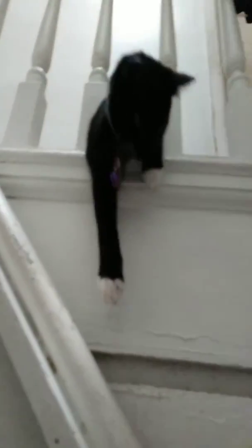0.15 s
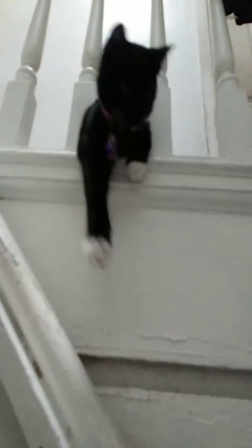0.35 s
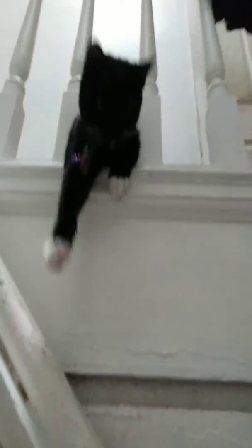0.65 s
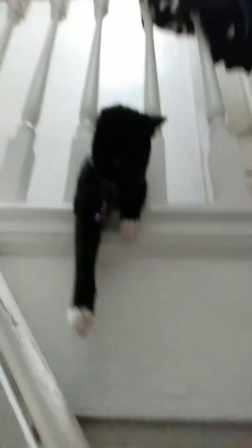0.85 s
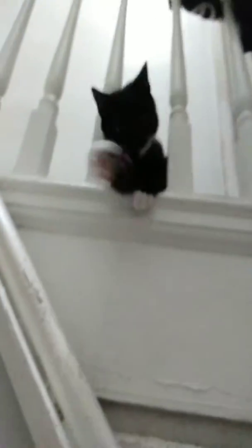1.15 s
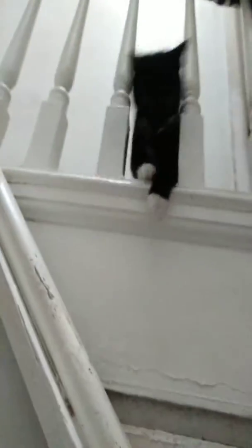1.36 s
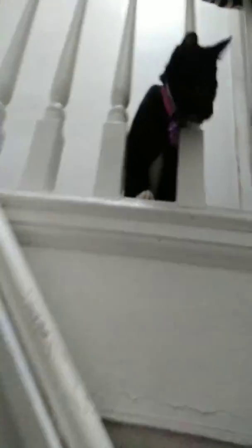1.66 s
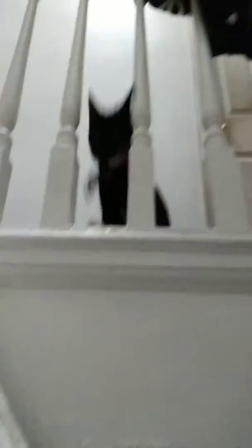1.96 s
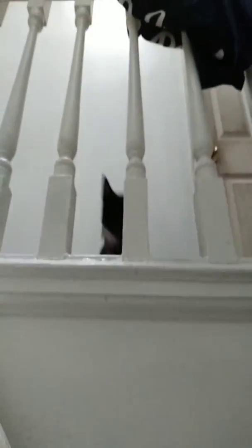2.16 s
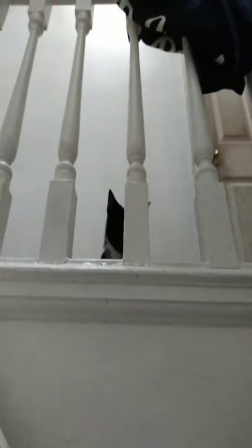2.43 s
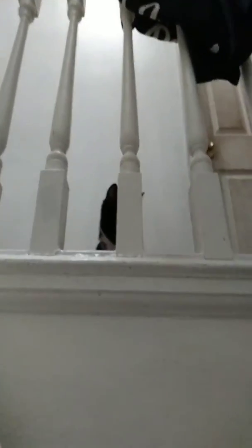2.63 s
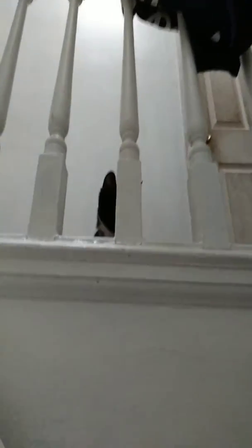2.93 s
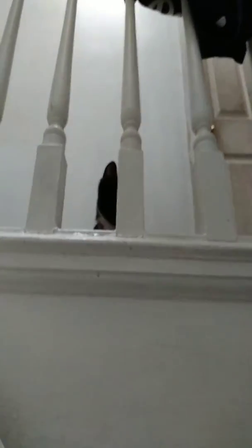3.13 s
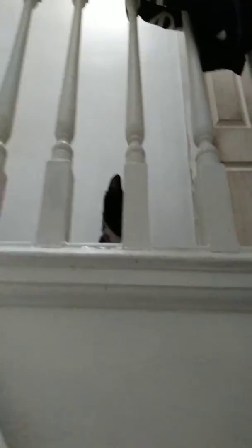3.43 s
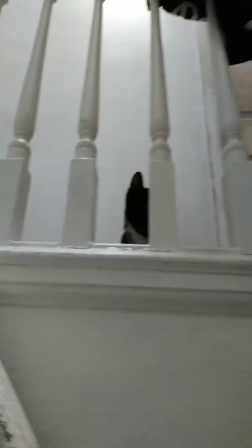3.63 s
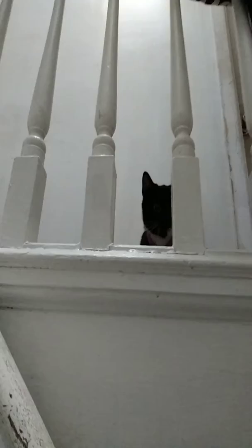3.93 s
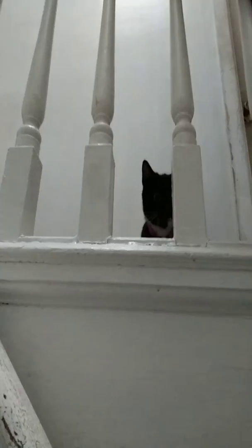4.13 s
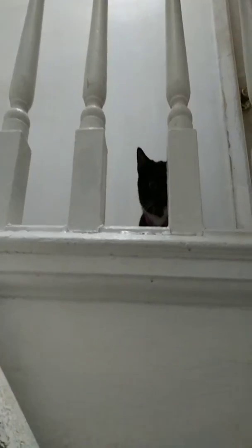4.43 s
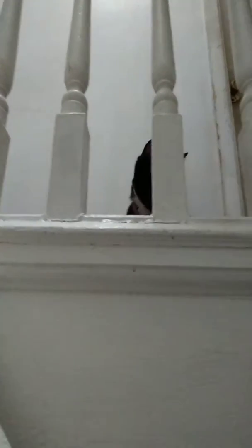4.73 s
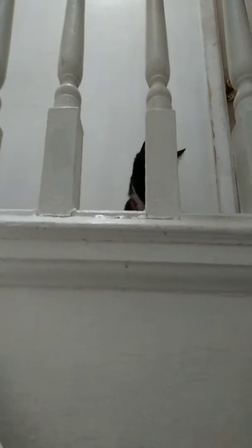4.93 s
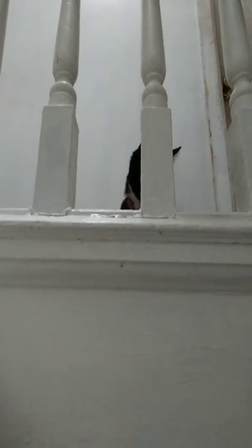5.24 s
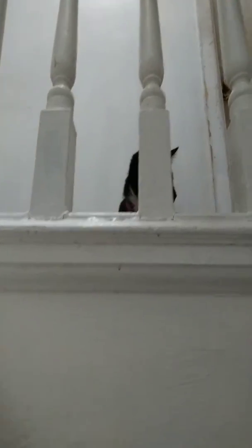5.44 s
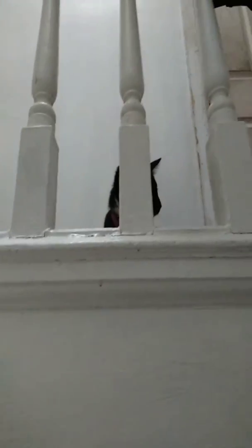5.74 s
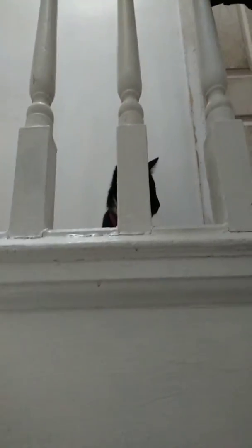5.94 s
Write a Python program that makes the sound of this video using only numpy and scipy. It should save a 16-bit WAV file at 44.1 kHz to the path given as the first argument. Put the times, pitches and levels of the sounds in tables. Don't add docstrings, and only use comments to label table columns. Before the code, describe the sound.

Low, steady room hiss with a very faint hum runs throughout, close to silence at first. Around 0.8 s come a couple of tiny ticks, then at 1.1 s a thin, high bell clink with light rustling, and fainter tinkles with soft paw thumps at 1.3-1.4 s. At about 1.87 s the collar bell is shaken hard: a very loud, piercing metallic chatter lasting under a tenth of a second, the tag knocking lower beneath it, overloading the microphone. A clear ting at 2.03 s and weak tinkles to 2.35 s die in a short, bare stairwell echo. Rustling, a soft thump and dry ticks come at 3.0-3.2 s, small ticks and a wooden knock at 3.7-4.1 s. After a lull, a sharp tick at 4.88 s starts scattered claw ticks, wooden taps, muffled thumps and rustles until about 5.8 s, leaving hiss.

```python
import sys
import numpy as np
from scipy import signal
from scipy.fft import next_fast_len
from scipy.io import wavfile
from scipy.ndimage import uniform_filter1d

SR = 44100
rng = np.random.default_rng(int(sys.argv[2]) if len(sys.argv) > 2 else 0)


def store_wav(level_fs):
    pcm = np.round(np.clip(np.atleast_2d(level_fs), -1, 1) * 32767)
    wavfile.write(sys.argv[1], SR, pcm.T.astype(np.int16))


def voltage_ratio(decibels):
    exponent = np.asarray(decibels, float) / 20
    return 10 ** exponent


N = 268128


def evened(x):
    return x / np.sqrt(np.mean(x ** 2) + 1e-30)


def read(points, hz):
    f, value = np.transpose(points)
    return np.interp(np.log(hz + 1), np.log(f + 1), value)


def add(mix, s, sound):
    part = mix[round(s * SR):][:len(sound)]
    part += sound[:len(part)]


def band(x, lo_hz, hi_hz):
    return signal.sosfilt(signal.butter(4, [lo_hz, hi_hz], "bandpass", fs=SR, output="sos"), x)


def coloured(x, points):
    gain_db = np.maximum(read(points, abs(np.fft.fftfreq(2048, 1 / SR))), -80)
    log_gain = np.log(voltage_ratio(gain_db))
    taps = np.fft.ifft(np.exp(np.conj(signal.hilbert(log_gain)))).real[:1024]
    return signal.oaconvolve(x, taps)[:len(x)]


def ring(hz, t60, rise=0.0015):
    t = np.arange(round(1.3 * t60 * SR)) / SR
    onset = np.sin(np.pi / 2 * np.minimum(t / rise, 1)) ** 2
    return onset * voltage_ratio(-60 * t / t60) * np.sin(2 * np.pi * hz * t)


def room_tone(patchy_db=1.26):
    # frequency in Hz, density in dB per Hz.
    hiss_colour = [(26, -41), (45, -8.5), (226, -1.5), (275, -1.5), (417, -3.5), (533, -7), (681, -7),
                   (891, -10.5), (1720, -11.5), (2680, -20.5), (4820, -20.5), (6160, -29), (8670, -13),
                   (10500, -23.5), (15600, -25)]
    # frequency in Hz, level in dB.
    hum_tones = [(59, -80), (118.4, -81), (236.9, -77.5), (419.9, -74.5), (457.6, -85), (683.7, -85)]
    frames, hz = N // 512 + 5, np.fft.rfftfreq(2048, 1 / SR)
    real, imag, patches = rng.standard_normal((frames, 1025, 3)).T
    patches = uniform_filter1d(patches, 20, 0)
    patches = evened(uniform_filter1d(patches, 12, 1))
    z = (real + 1j * imag) * voltage_ratio(read(hiss_colour, hz)[:, None] + patchy_db * patches)
    hiss = signal.istft(z, nperseg=2048, noverlap=1536)[1][:N]
    out = voltage_ratio(-62) * evened(hiss)
    t = np.arange(N) / SR
    for f_hz, db in hum_tones:
        waver_db = 3 * evened(uniform_filter1d(rng.standard_normal(N), 5000))
        drift_rad = 0.928 * evened(uniform_filter1d(rng.standard_normal(N), 5000))
        out += np.sqrt(2) * voltage_ratio(db + waver_db) * np.sin(2 * np.pi * f_hz * t + drift_rad)
    return out


def movements():
    # start in seconds, hold in seconds, release in seconds per 20 dB, level in dB, weight
    # behind it in dB.
    jerks = [(0.838, 0.0098, 0.05, -82.5, 12), (1.139, 0.019, 0.07, -71.5, 7), (1.293, .006, 0.07, -72, 7),
             (1.339, 0.082, 0.14, -73.5, -2.5), (1.422, 0.0124, 0.11, -80, 17),
             (1.863, 0.0064, 0.0357, -43, -6), (1.877, 0.0412, .11, -53, 0),
             (2.103, 0.0665, 0.0373, -69, 10.5), (3.003, 0.1227, 0.1072, -64.5, -1),
             (3.157, .022, .16, -64.5, 5), (3.659, .006, .015, -84, 24.5),
             (4.874, 0.0163, 0.113, -61, -0.5), (5.073, 0.0064, 0.0479, -64, 10.5),
             (5.095, .016, 0.06, -69, 9), (5.375, 0.0146, 0.0342, -60, 3), (5.399, .085, 0.08, -64, 3),
             (5.648, .01, 0.14, -76.5, 11.5)]
    # start in seconds, hold in seconds, swell in seconds per 20 dB,
    # level in dB, weight behind it in dB.
    shifts = [(0.773, 0.0103, 0.01, -86.5, 13.5), (1.548, 0.155, 0.32, -75, -1.5),
              (1.992, 0.098, 0.19, -71, 7), (2.97, 0.031, 0.03, -73.5, -13.5), (3.04, 0.029, 0.07, -66, -2),
              (3.081, 0.0385, 0.0561, -72, 14), (3.5, .25, 0.16, -78, -2), (3.76, 0.0192, 0.02, -76, -5.5),
              (3.83, 0.021, 0.06, -70, 0), (3.988, .03, 0.07, -74.5, 0),
              (4.065, 0.0195, 0.0731, -66.5, -1.5), (4.23, 0.0203, 0.19, -75, 3),
              (4.84, 0.0193, 0.32, -78.5, 5), (5.02, .03, 0.07, -74.5, 5.5), (5.2, .12, 0.2, -79, 12),
              (5.349, .01, 0.1, -70, 3.5)]
    jerk_rise_s = 0.003
    strokes = [(*row, jerk_rise_s) for row in jerks]
    strokes += [(*row, row[2]) for row in shifts]
    t, light, heavy = np.arange(N) / SR, np.zeros(N), np.zeros(N)
    for s, hold, release, db, weight_db, rise in strokes:
        away = np.maximum((s - t) / rise, (t - s - hold) / release)
        power = voltage_ratio(db - 20 * np.maximum(away, 0)) ** 2
        light += power
        heavy += power * voltage_ratio(weight_db) ** 2
    return np.sqrt(light), np.sqrt(heavy)


def rubbing(grains_per_s=6000, spread_db=2.6):
    # frequency in Hz, density in dB per Hz.
    treble_colour = [(1760, -29.5), (3000, -14), (4890, -12), (6260, -16.5), (7080, -15.5), (8120, -1),
                     (8640, 2.5), (9190, -1.5), (11300, -13), (15500, -19.5)]
    # frequency in Hz, density in dB per Hz.
    body_colour = [(71, -37.5), (120, -11), (317, -2.5), (539, -10.5), (666, -11), (1220, -7), (3030, -19),
                   (4500, -20.5), (5850, -44.5), (9900, -120)]
    clumps = voltage_ratio(1.303 * evened(uniform_filter1d(rng.standard_normal(N), 400)))
    slips = rng.standard_normal(N) * voltage_ratio(spread_db * np.minimum(rng.exponential(1, N), 4))
    slips = slips * (rng.random(N) < grains_per_s / SR)
    slips = clumps * (slips + 0.5 * rng.standard_normal(N))
    treble, body = coloured(slips, treble_colour), coloured(slips, body_colour)
    treble = treble / band(treble, 10300, 15000).std()
    body = body / band(body, 500, 3500).std()
    light, heavy = movements()
    return treble * light + body * heavy


def thumps():
    # start in seconds, peak in dB, frequency in Hz.
    paw_falls = [(1.255, -55, 285), (1.293, -52.5, 341), (1.786, -49, 311), (1.862, -45.5, 252),
                 (1.866, -57, 70), (5.39, -57.5, 95), (2.08, -47.5, 300.2), (2.237, -54.5, 108.2),
                 (3.089, -45, 258), (4.927, -46.5, 274), (5.08, -48.5, 450), (5.379, -61.5, 425.5),
                 (5.656, -46.5, 295)]
    out = np.zeros(N)
    for s, db, hz in paw_falls:
        t = np.arange(round(6 / hz * SR)) / SR
        swell = 1.1 * hz * t * np.exp(1 - 1.1865 * hz * t)
        add(out, s, voltage_ratio(db) * swell * np.sin(2 * np.pi * hz * t))
    return out


def ticks():
    # start in seconds, peak in dB, body in Hz, body level in dB.
    taps = [(0.7572, -53, 703, -50), (0.8525, -48.5, 720, -54), (1.4244, -58.5, 1420, -55),
            (1.696, -54, 1200, -67), (1.729, -49, 1200, -66.5), (2.032, -35, 1200, -60.5),
            (3.116, -40, 1200, -53.5), (3.1644, -42.5, 767, -42), (3.6633, -64.5, 1900, -37),
            (3.8228, -49, 1720, -50.5), (4.0365, -44, 966, -59.5), (4.0635, -38, 3910, -43),
            (4.0785, -41, 935, -60.5), (4.8781, -26.5, 1014, -45.5), (4.9714, -53, 1370, -64),
            (5.0322, -47.5, 4600, -46), (5.0753, -37.5, 3985, -27), (5.1012, -49, 1460, -40.5),
            (5.1576, -51, 1220, -62.5), (5.2446, -43.5, 1230, -50), (5.285, -60, 3600, -56.5),
            (5.351, -40, 1106, -56.5), (5.3745, -33, 1150, -47), (5.3837, -38.5, 1463, -35.5),
            (5.468, -39, 1040, -46.5), (5.648, -58, 1000, -47), (5.6842, -50, 954, -58),
            (5.7633, -47, 4500, -55)]
    # start in seconds, body in Hz, body level in dB.
    knocks = [
        (1.4259, 3000, -43),
        (2.083, 4000, -45.5),
        (1.1381, 4500, -46.5),
        (5.0755, 6100, -42),
        (5.0761, 615, -39.5),
        (5.3856, 2480, -38),
        (5.3873, 4500, -36),
        (3.6645, 900, -46),
        (1.864, 3300, -36),
    ]
    # frequency in Hz, density in dB per Hz.
    click_colour = [(880, -46), (1500, -8), (2170, -5), (2890, -32), (4750, -2.5), (5140, -12), (8880, 12),
                    (14800, -16), (15500, -36)]
    bright, body, t = np.zeros(N), np.zeros(N), np.arange(4000) / SR
    rattle_s = 0.0273
    snap = 0.2 * np.exp(-t / 0.00016) + 0.11 * np.exp(-t / rattle_s * 3.02)
    for (s, db, *_), grit in zip(taps, rng.standard_normal((len(taps), len(t)))):
        add(bright, s, voltage_ratio(db) * (0.75 * (t == 0) + snap * grit))
    for s, *_, hz, body_db in taps + knocks:
        add(body, s, voltage_ratio(body_db) * ring(hz, 14 / hz, rise=1.03 / hz))
    click_peak = abs(coloured(np.arange(2048) == 0, click_colour)).max()
    return coloured(bright, click_colour) / click_peak + body


def tag():
    # start in seconds, level in dB.
    tag_knocks = [
        (1.8629, -39.5),
        (1.889, -42),
        (1.895, -40),
        (1.912, -42),
    ]
    # frequency in Hz, level in dB, t60 in seconds.
    tag_modes = [(2020.8, -6, .05), (2992, -5.5, .05), (3343, -7.5, .03), (3968, -5.5, .06),
                 (4050, -8.5, 0.054), (4285, -2, 0.049)]
    detune = 0.012
    out = np.zeros(N)
    for (s, knock_db), shift in zip(tag_knocks, rng.standard_normal((len(tag_knocks), len(tag_modes)))):
        for (hz, db, t60), z in zip(tag_modes, shift):
            add(out, s, voltage_ratio(knock_db + db) * ring(hz * (1 + detune * z), t60))
    return out


def stairwell(x):
    # frequency in Hz, t60 in seconds.
    decay = [(300, 0.3995), (2000, 0.45), (6000, 0.1), (8000, 0.3104), (10000, 0.24024), (15000, .15)]
    echoes = np.zeros(SR // 2)
    at = np.arange(130, len(echoes) - 12, 12)
    echoes[at + rng.integers(0, 12, len(at))] = rng.choice([-1., 1.], len(at))
    hz, t, z = signal.stft(echoes, SR, nperseg=128)
    tail = signal.istft(z * voltage_ratio(-60 * t / read(decay, hz)[:, None]), SR, nperseg=128)[1]
    return signal.fftconvolve(x, tail / np.linalg.norm(tail))[:N]


def bell():
    # start in seconds, low mode in dB, upper modes against it in dB,
    # top modes against it in dB.
    strikes = [(1.1381, -35.5, 4, -26), (1.293, -55, 11, -22.5), (1.3406, -68, 6, 5),
               (1.3774, -56, -7, -22), (1.3894, -56, -1.5, -24.5), (1.4213, -66.5, 1, -14),
               (1.788, -62, 2.5, -22), (2.034, -27, -12.5, -50), (2.058, -44.5, 2, -30),
               (2.1584, -46, -8, -28), (2.2394, -60, -6, -24), (2.2694, -62.5, -8, -24.5),
               (2.3094, -55, -10, -23), (2.3494, -62, -7, -20)]
    # start in seconds, low mode in dB.
    chatter = [(1.8685, -1), (1.8715, 1), (1.8743, 0.5), (1.8772, 2), (1.883, 2), (1.8865, 2), (1.8905, 2),
               (1.8965, -3), (1.9005, -1), (1.91, -6), (1.9205, -6.5), (1.9365, -9.5), (1.944, -10),
               (1.953, -15)]
    # frequency in Hz, t60 in seconds, level within its group in dB,
    # group (0 low, 1 upper, 2 top).
    shell_modes = [(8032.4, 0.069, 0, 0), (8229, .04, -12.5, 0), (8910, 0.034, 2.5, 1),
                   (10259, .03, -22.5, 1), (13900, .035, 7, 2), (13450, .03, -5.5, 2), (4290, .025, -7, 2)]
    near_wet_db, far_wet_db = -13, -5
    light_contact_s = 0.0008
    blow_contact_s, roll_contact_s, settle_s = 0.00025, 0.0013, 0.003
    upper_db, top_db, damped_length = -22, -55.5, 0.36
    swing_detune = 0.006
    shake_s = chatter[0][0]
    hits = []
    for row in strikes:
        wet_db = near_wet_db if row[0] < shake_s else far_wet_db
        hits.append((*row, wet_db, 1, light_contact_s, 0))
    for s, db in chatter:
        contact_s = np.interp(s - shake_s, [0, settle_s], [blow_contact_s, roll_contact_s])
        hits.append((s, db, upper_db, top_db, far_wet_db, damped_length, contact_s, swing_detune))
    direct, sent = np.zeros(N), np.zeros(N)
    shifts = rng.standard_normal((len(hits), len(shell_modes)))
    for (s, low_db, up_db, high_db, wet_db, length, contact_s, detune), shift in zip(hits, shifts):
        for (hz, t60, db, group), z in zip(shell_modes, shift):
            level = voltage_ratio(low_db + (0, up_db, high_db)[int(round(group))] + db)
            mode_hz = hz * (1 + detune * (1 + 3 * group) * z)
            mode = level * ring(mode_hz, t60 * length, contact_s)
            add(direct, s, mode)
            add(sent, s, voltage_ratio(wet_db) * mode)
    return direct, sent


def scene():
    direct, sent = bell()
    near = ticks() + thumps() + tag()
    echoes = stairwell(sent + voltage_ratio(-12) * near)
    return (direct + near + echoes + rubbing() + room_tone())[None]


def top_cut(x):
    return signal.sosfilt(signal.butter(12, 16330, fs=SR, output="sos"), x)


def record(dry):
    dry = signal.sosfilt(signal.butter(4, 48, "highpass", fs=SR, output="sos"), dry)
    dry = dry + voltage_ratio(-73) * band(rng.standard_normal(N), 22, 40)
    peak_db = 20 * np.log10(abs(signal.hilbert(dry[0], next_fast_len(N))[:N]) + 1e-9)
    fall_db = np.arange(N) * 1500 / SR
    held_peak_db = np.maximum.accumulate(peak_db + fall_db) - fall_db
    over_db = np.maximum(held_peak_db + 2.6, 0)
    held = dry / voltage_ratio(uniform_filter1d(over_db, 40))
    low_pass = signal.firwin(511, 15580, window=("kaiser", 9), fs=SR)
    return top_cut(signal.oaconvolve(held, low_pass[None], "same"))


dry = scene()
out = record(dry)
store_wav(out)
```